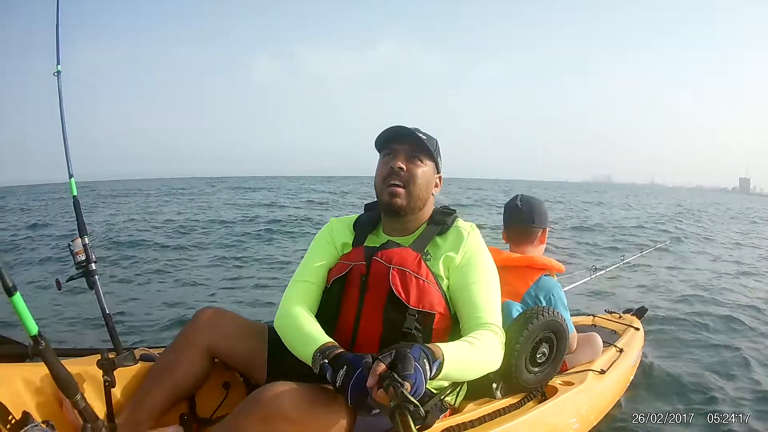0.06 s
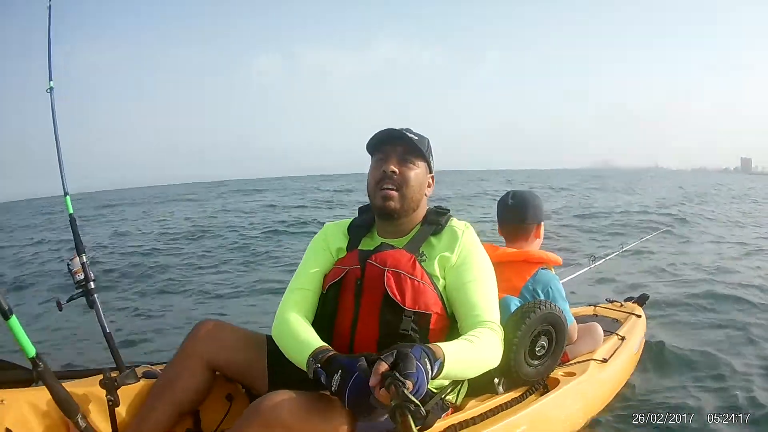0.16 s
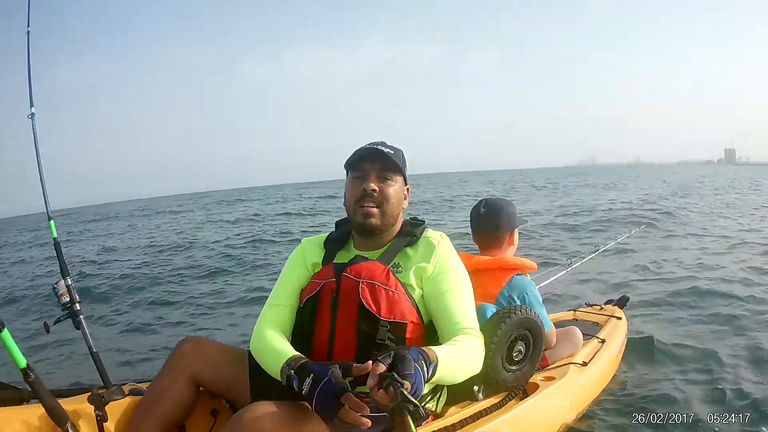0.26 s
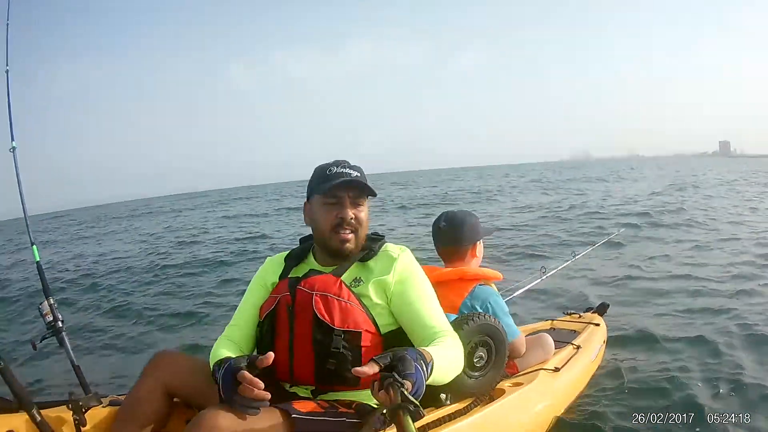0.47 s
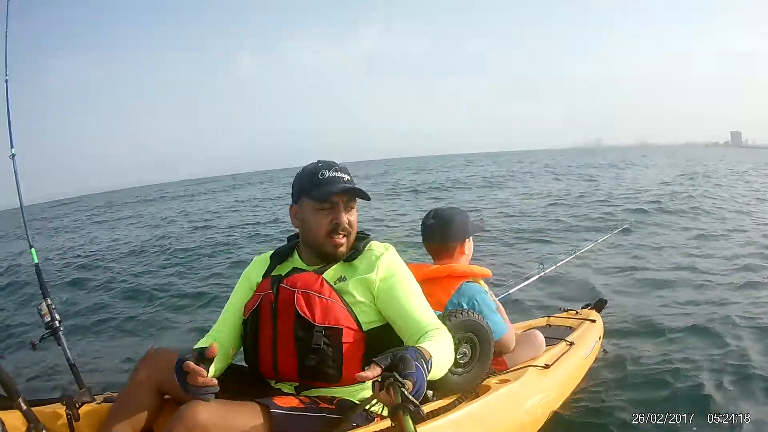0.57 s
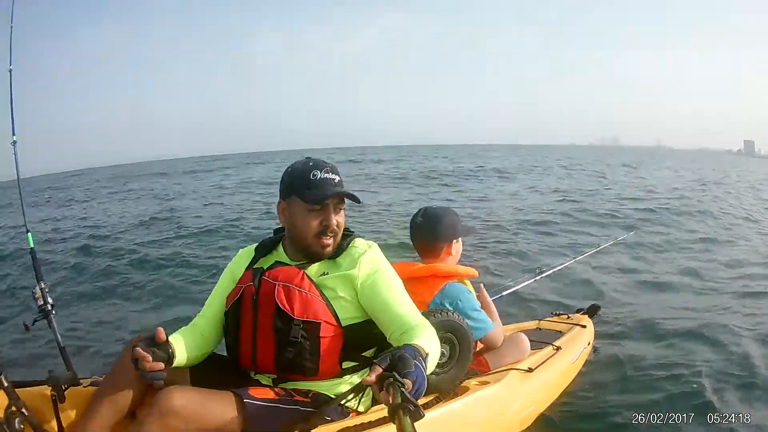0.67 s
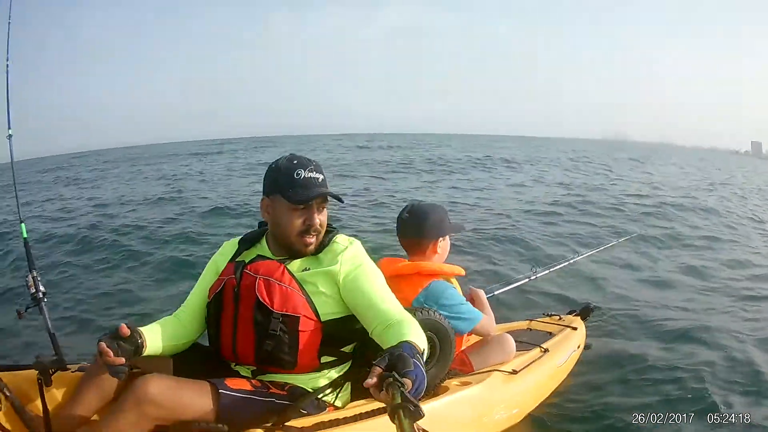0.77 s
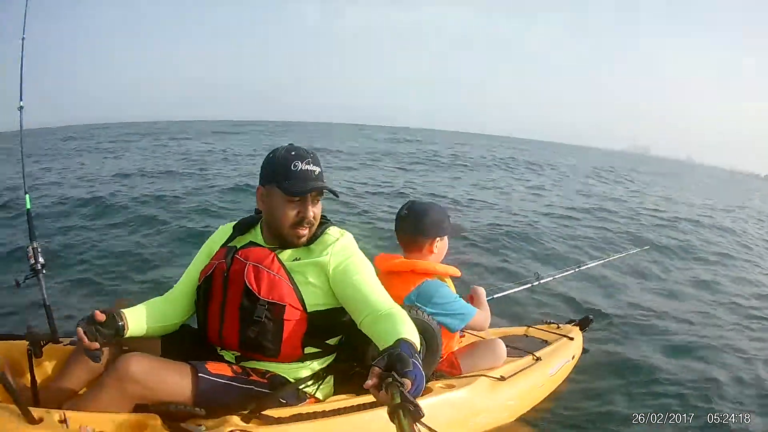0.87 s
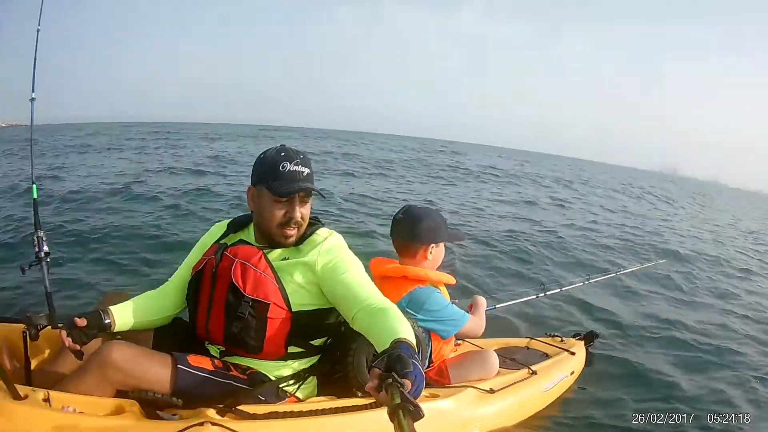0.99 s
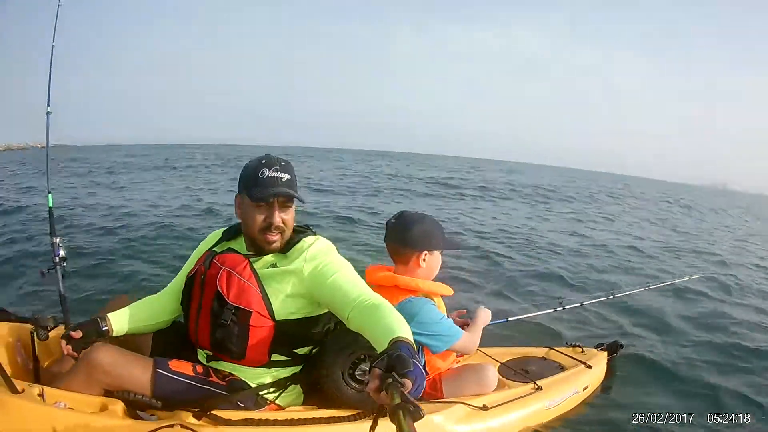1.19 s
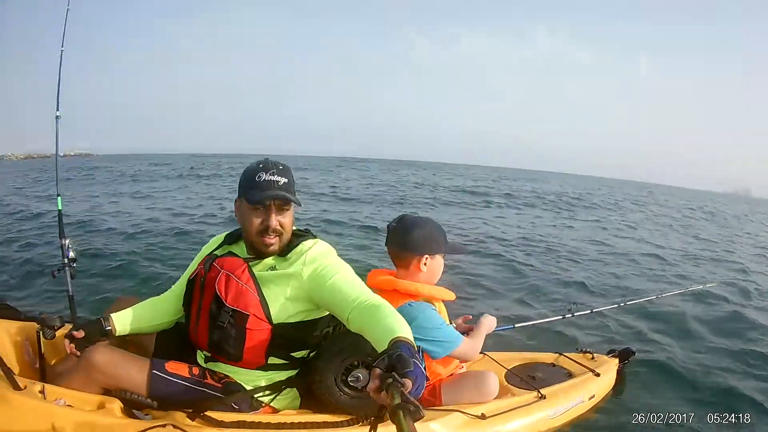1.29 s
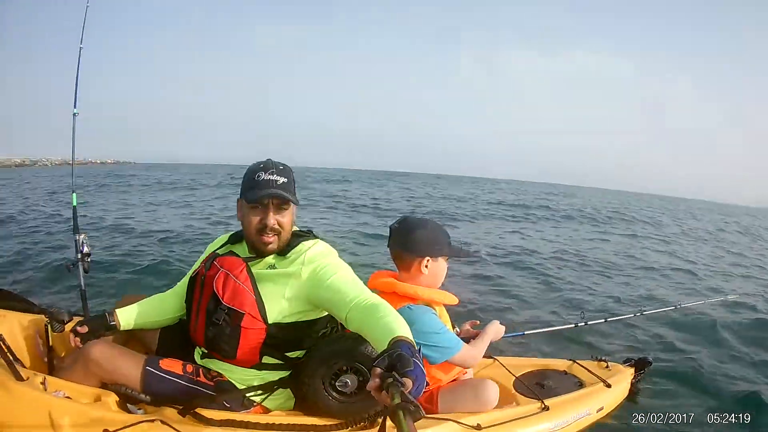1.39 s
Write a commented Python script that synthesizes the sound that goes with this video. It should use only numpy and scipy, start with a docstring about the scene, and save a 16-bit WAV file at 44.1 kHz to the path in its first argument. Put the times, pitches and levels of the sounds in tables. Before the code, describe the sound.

Handling knocks of a camera on a pole, heard from inside its sealed plastic case aboard a kayak. A faint scrape runs over dull, quiet sea wash and hiss. Low thuds and a rub come around 0.2 seconds, more thumps near 0.38, then the loudest, a hard clattering plastic clack with a squawk at 0.44. Small clicks follow at 0.52 and 0.72, a brief creak at 0.78, and a faint tick at 1.12.

```python
"""First comes a dull wash of calm sea with faint hiss, a soft scrape already under way; then thuds begin.
Place: aboard a kayak, a camera swung round on its pole. The microphone is sealed in a plastic housing,
so nearly all comes through the mount. Shaped noise makes the sea and hiss; a wavering tone, the sway.
Random catches make the scrapes; struck decaying modes make the thuds, knocks and creak; rapid slips
make the judder, and bursts of bright noise the ticks."""
import sys
import numpy as np
from scipy import signal
from scipy.fft import rfft, irfft, next_fast_len
from scipy.io import wavfile
from scipy.ndimage import uniform_filter1d

SR = 44100
rng = np.random.default_rng(int(sys.argv[2]) if len(sys.argv) > 2 else 0)


def inscribe(sig):
    """Save sig as 16-bit PCM at rate SR to the path in sys.argv[1].

    A 1-D sig is mono; a 2-D sig holds one channel per row.
    Samples are clipped to [-1, 1] before scaling.
    """
    pcm = np.round(np.clip(np.atleast_2d(sig).T, -1, 1) * 32767)
    wavfile.write(sys.argv[1], SR, pcm.astype(np.int16))


N = 63945
T = np.arange(N) / SR
RING_TOP_HZ = 3140       # sliding contacts excite little ring above this
THUD_CONTACT_HZ = 417    # low-pass on the ring of the pole


def from_db(db):
    """Decibels to gain."""
    return 10 ** (np.asarray(db) / 20)


def rms_one(x):
    """Scale to unit power."""
    return x / np.sqrt(np.mean(x ** 2) + 1e-20)


def low_pass(x, hz, order=2):
    """Dull a sound above the given frequency."""
    return signal.sosfilt(signal.butter(order, hz, fs=SR, output="sos"), x + 1e-18)


def band_pass(x, edges_hz):
    """Keep the range between two frequencies."""
    return signal.sosfilt(signal.butter(3, edges_hz, "band", fs=SR, output="sos"), x + 1e-18)


def colour(x, spectrum):
    """Give a noise the listed spectrum, at unit power."""
    hz, db = np.transpose(spectrum)
    size = next_fast_len(N + SR // 20, real=True)
    bins_hz = np.maximum(np.arange(size // 2 + 1) * SR / size, 1)
    # levels run straight between the listed points on a log frequency axis
    gain = from_db(np.interp(np.log(bins_hz), np.log(hz), db))
    return rms_one(irfft(rfft(x, size) * gain, size)[:N])


def dying(s, t60):
    """Envelope that starts at s and loses 60 dB in t60."""
    return (T >= s) * np.exp(-np.log(1000) * np.maximum(T - s, 0) / t60)


def ring(modes, s):
    """Modes struck at time s, in alternating directions, each dying at its own rate."""
    out = np.zeros(N)
    start = int(np.ceil(s * SR))
    for k, (hz, db, t60) in enumerate(modes):
        span = slice(start, start + int(2 * t60 * SR))
        age = T[span] - s
        decay = np.exp(-np.log(1000) * age / t60)
        out[span] += (-1) ** k * from_db(db) * decay * np.sin(2 * np.pi * hz * age)
    return out


def steady(x):
    """Unit power, with the slow swings evened out over 0.09 s as under a steady hand."""
    power = uniform_filter1d(x ** 2, int(0.09 * SR))
    return x / np.sqrt(np.abs(power) + 1e-20)


# Muffled sea and hiss inside the housing: f/Hz, relative level per Hz/dB
SEA_SPECTRUM = [(20, -4), (60, 1.5), (120, -11.5), (250, -19), (550, -23.5), (850, -30.5), (1400, -26.5),
                (2200, -37.5), (4000, -42.5), (7000, -47), (8000, -48.5), (15500, -47)]


def sea():
    """Steady noise, heavy in the lows: what the sealed housing leaves of the sea, plus hiss."""
    return from_db(-54.5) * colour(rng.standard_normal(N), SEA_SPECTRUM)


# Slow rise and fall of the pole's sway: t/s, level/dB
SWAY_LEVELS = [(0, -53.5), (.12, -76.5), (.2, -35), (0.269, -44.5), (0.341, -44.5), (.49, -39), (.59, -50),
               (.69, -39.5), (.84, -39), (0.918, -45.5), (1.078, -49.5), (1.14, -44.5), (1.25, -53.5),
               (1.45, -55.5)]
SWAY_HZ, SWAY_WANDER = 33, 0.13   # mean pitch; rms wander as a share of it


def sway():
    """The weight of the camera wobbles at the end of the pole, a low tone of wandering pitch."""
    s, db = np.transpose(SWAY_LEVELS)
    wander = rms_one(low_pass(rng.standard_normal(N), 10))
    phase = 2 * np.pi * np.cumsum(SWAY_HZ * (1 + SWAY_WANDER * wander)) / SR
    return from_db(np.interp(T, s, db)) * np.sin(phase)


# Ringing modes of the plastic housing: f/Hz, level/dB, t60/s
HOUSING_MODES = [(524.9, -9.5, 0.13), (538.6, -15, 0.12), (636.8, -24.5, .42), (850, -18.5, 0.021),
                 (1002.6, -26.5, .055), (1167, -6, 0.029), (1222.5, 3, 0.039), (1322, -6.5, 0.028),
                 (1333, -11, 0.013), (1467, -5.5, 0.036), (1646, -13.5, 0.052), (1822, -11.5, .045),
                 (2083, -38.5, 0.14), (2455, -28.5, 0.013)]


def housing_ring(s):
    """The housing struck at time s."""
    return ring(HOUSING_MODES, s)


# Dense modes of the plastic under that ring: f/Hz, relative level per Hz/dB
PLASTIC_SPECTRUM = [(200, -29), (420, -20.5), (530, -2), (750, -21), (860, -1), (1050, -4), (1170, 10.5),
                    (1700, 1), (1880, -10.5), (2020, -11.5), (2600, -15), (2880, -33), (3250, -24.5),
                    (3700, -38.5), (4300, -33.5), (4800, -46), (7000, -48), (7800, -80)]


def crackle(s):
    """Short noise burst from the dense modes of the plastic, gone in milliseconds."""
    return colour(rng.standard_normal(N), PLASTIC_SPECTRUM) * dying(s, 0.0083)


# Bending modes of the pole: f/Hz, t60/s, level when rubbed/dB
POLE_MODES = [(86.8, 0.18, 2), (149.9, .16, 1), (297.9, .19, -16)]


def pole_ring(s, levels_db):
    """The pole set bending at time s, with a level for each mode."""
    return ring([(hz, db, t60) for (hz, t60, _), db in zip(POLE_MODES, levels_db)], s)


# Strokes of the joint and the glove: t/s, rise/s, hold/s, release/s, level/dB, cut-off f/Hz,
# hollow body level/dB, low rumble level/dB
RUB_STROKES = [(-.03, 0.018, 0.079, 0.0078, -55, 4300, -2, 7),
               (0.049, 0.016, .11, 0.042, -53, 3460, -5.5, 15),
               (0.186, 0.0039, 0.033, 0.037, -32.5, 5360, -2, 5),
               (0.267, 0.015, 0.083, 0.013, -63, 2630, -1, 17.5),
               (0.388, 0.0045, 0.034, 0.018, -54.5, 1350, 14.5, 20),
               (0.433, 0.0054, 0.019, 0.035, -18.5, 3300, -4.5, -29),
               (.478, 0.0054, 0.0325, .04, -45.5, 3520, -9, -15),
               (.600, .008, 0.084, .03, -63, 3520, -5.5, 11),
               (0.673, 0.0062, .008, 0.013, -45, 3000, -2.5, 10),
               (0.754, 0.011, 0.023, 0.058, -52, 3630, -10, -8),
               (0.782, .005, .02, 0.13, -60, 3410, -5.5, 3.5),
               (1.102, .012, .006, 0.033, -53, 5100, 0.5, 4.5),
               (1.218, 0.04, 0.012, 0.078, -57.5, 3500, -0.5, -7)]
GRAINS_PER_S, GRAIN_SPREAD_DB = 850, 1             # mean rate of catches; spread of their strength
RUB_RING_DB, POLE_RING_DB = -7, 2.5                # housing ring in the grind; pole ring in the rumble
BODY_HZ, RUMBLE_HZ = (481, 773), (55.3, 130)       # hollow range of the housing; range of the rumble


def rubs():
    """Friction is a dense run of tiny catches that ring the housing and rumble in the pole."""
    out = np.zeros(N)
    housing = low_pass(housing_ring(0), RING_TOP_HZ, order=4)
    pole = low_pass(pole_ring(0, [db for _, _, db in POLE_MODES]), THUD_CONTACT_HZ)
    for s, rise, hold, release, db, hz, body_db, rumble_db in RUB_STROKES:
        strength = from_db(GRAIN_SPREAD_DB * rng.standard_normal(N))
        grains = (rng.random(N) < GRAINS_PER_S / SR) * rng.choice([-1, 1], N) * strength
        rung_housing = rms_one(signal.fftconvolve(grains, housing)[:N])
        grind = colour(grains, PLASTIC_SPECTRUM) + from_db(RUB_RING_DB) * rung_housing
        rung_pole = rms_one(signal.fftconvolve(grains, pole)[:N])
        rumble = rms_one(band_pass(grains, RUMBLE_HZ)) + from_db(POLE_RING_DB) * rung_pole
        corners = s + np.cumsum([0, rise, hold, release])
        stroke = np.interp(T, corners, [0, 1, 1, 0]) ** 2
        sound = steady(low_pass(grind, hz, order=3))
        sound += from_db(body_db) * steady(band_pass(grind, BODY_HZ))
        sound += from_db(rumble_db) * steady(rumble)
        out += from_db(db) * stroke * sound
    return out


# Ringing modes of the joint: f/Hz, level/dB, t60/s
JOINT_MODES = [(846, -11.5, 0.058), (1187, -12.5, 0.086), (1476, -2, 0.066), (1580, -2.5, 0.031),
               (1663, 0, 0.022), (2290, -12.5, 0.015), (2550, -24, 0.069)]
# Run of slips in the joint: t/s, level/dB
CREAK_SLIPS = [(0.754, -49), (0.7614, -53), (0.767, -41.5), (.7728, -39), (0.7805, -32), (.783, -38.5),
               (0.7904, -39.5), (0.793, -58.5)]
SLIP_GRIT_DB = -8.5   # crackle under each slip


def creak():
    """The joint sticks and slips, each slip ringing it; the run swells and eases off."""
    out = np.zeros(N)
    for s, db in CREAK_SLIPS:
        out += from_db(db) * (ring(JOINT_MODES, s) + from_db(SLIP_GRIT_DB) * crackle(s))
    return low_pass(out, RING_TOP_HZ, order=4)


# Colour of the catch: f/Hz, relative level per Hz/dB
CATCH_SPECTRUM = [(1500, -10), (2550, 4), (2900, -18), (3270, 9.5), (3650, -20.5), (4050, -4.5),
                  (4500, 0.5), (4900, -26), (5500, -5), (6000, -15), (6400, -7), (7300, -10), (8000, -45)]
# Sharp ticks of the catch: t/s, peak level/dB, t60/s, cut-off f/Hz
CATCH_TICKS = [(0.5243, -51, 0.014, 4450), (0.7159, -41, 0.017, 9170), (1.1201, -58.5, 0.0165, 4000)]


def ticks():
    """The catch snaps over with dry, bright clicks, each a dying burst of coloured noise."""
    out = np.zeros(N)
    for s, db, t60, hz in CATCH_TICKS:
        burst = rng.standard_normal(N) * dying(s, t60)
        snap = low_pass(colour(burst, CATCH_SPECTRUM), hz, order=8)
        out += from_db(db) * snap / np.abs(snap).max()
    return out


# Thuds along the pole: t/s, low mode level/dB, middle mode level/dB, upper mode level/dB
POLE_THUDS = [(0.077, -42.5, -56.5, -58.5), (.127, -37.5, -32, -63), (.190, -19, -34.5, -37.5),
              (0.2096, -15.5, -25, -33), (.255, -25, -40, -37), (0.3783, -24, -22.5, -45.5),
              (0.3929, -35.5, -15, -39), (0.442, -25.5, -41.5, -36.5), (.526, -39, -36, -42),
              (0.679, -63, -49, -41), (0.7168, -39, -30, -36), (1.118, -50, -33.5, -45),
              (1.249, -51, -45.5, -57.5)]


def thuds():
    """Jolts set the pole bending, each with its own mix of modes."""
    bends = sum(pole_ring(s, levels_db) for s, *levels_db in POLE_THUDS)
    return low_pass(bends, THUD_CONTACT_HZ)


# Knocks on the housing: t/s, level/dB, contact softness as cut-off f/Hz, crackle level/dB
HOUSING_KNOCKS = [(0.376, -43, 962, 19), (.3925, -35, 833, 21.5), (0.4358, -12, 2400, -10),
                  (.4404, -14.5, 2950, -13.5), (.4525, -20.5, 3020, -12), (0.4561, -17.5, 3086, -13),
                  (0.4623, -17, 2955, -9.5), (.526, -42, 5000, 12.5), (0.682, -45, 3000, 15.5),
                  (0.7162, -35.5, 5000, 18.5), (1.119, -49, 5930, 13), (1.275, -52.5, 2200, 8)]
PLASTIC_DB = -14   # added to every crackle level


def knocks():
    """Each contact rings the housing and crackles the plastic; soft contacts are duller."""
    out = np.zeros(N)
    for s, db, hz, crackle_db in HOUSING_KNOCKS:
        blow = housing_ring(s) + from_db(PLASTIC_DB + crackle_db) * crackle(s)
        out += from_db(db) * low_pass(blow, hz, order=4)
    return out


# The clamp gives, slipping in step with a housing mode: t/s, length/s, slip rate f/Hz, rms level/dB
CLAMP_JUDDERS = [(.4378, .011, 1198, -8), (.453, 0.016, 1440, -19)]
JUDDER_JITTER, JUDDER_ROUGH_DB = 0.021, 3   # timing scatter as share of a period; spread of the slips
JUDDER_RING_S = 0.05                        # t60 of the clamp's damping, on top of the housing's own


def judder():
    """Rapid slips pump one mode of the housing into a short, hard squawk."""
    out = np.zeros(N)
    housing = low_pass(housing_ring(0) * dying(0, JUDDER_RING_S), RING_TOP_HZ, order=4)
    for s, length, hz, db in CLAMP_JUDDERS:
        chance = rng.standard_normal((64, 2))
        times = s + np.cumsum(1 + JUDDER_JITTER * chance[:, 0]) / hz
        strength = from_db(JUDDER_ROUGH_DB * chance[:, 1])
        slips = np.zeros(N)
        slips[(times * SR).astype(int)] = (times < s + length) * strength
        squawk = rms_one(signal.fftconvolve(slips, housing)[:N])
        # the rms level counts the squawk's whole energy over the judder's length
        out += from_db(db) * squawk * np.sqrt(length * SR / N)
    return out


def scene():
    """The handled mount over the muffled sea."""
    # the sealed housing passes little of the blows above 4300 Hz
    blows = low_pass(knocks() + judder(), 4300, order=12)
    return (sea() + sway() + rubs() + creak() + ticks() + thuds() + blows)[None]


def record(dry):
    """The top is cut steeply above 15.8 kHz."""
    return signal.sosfilt(signal.ellip(12, 0.1, 80, 15800, fs=SR, output="sos"), dry)


dry = scene()
out = record(dry)
inscribe(out)
```